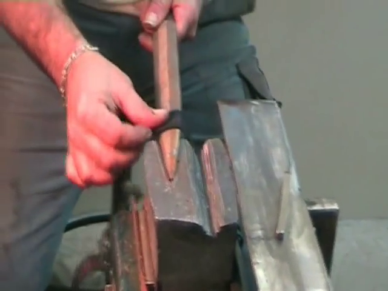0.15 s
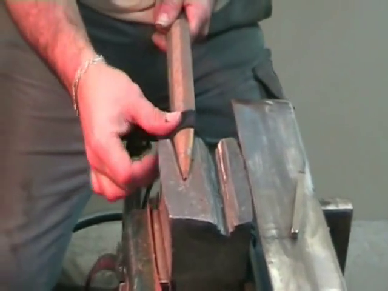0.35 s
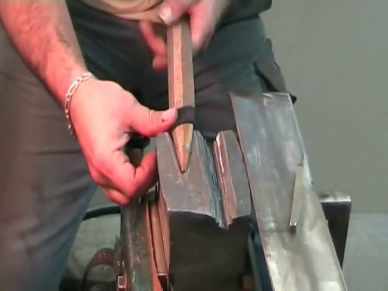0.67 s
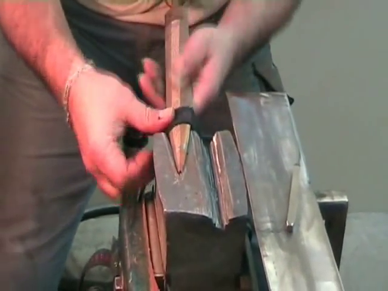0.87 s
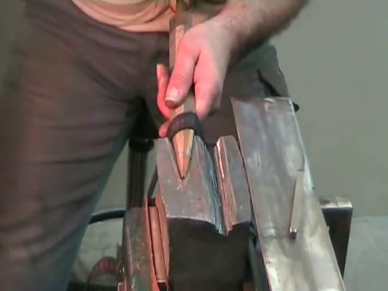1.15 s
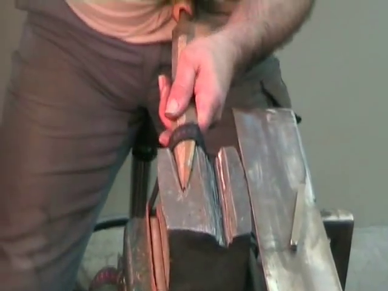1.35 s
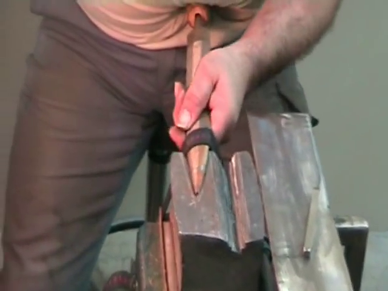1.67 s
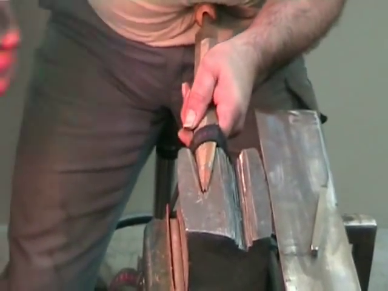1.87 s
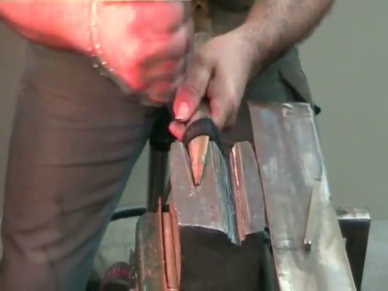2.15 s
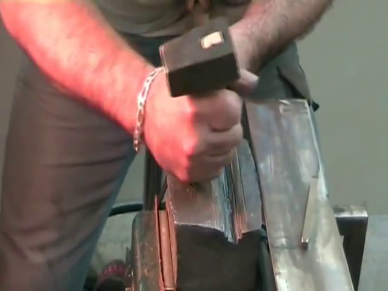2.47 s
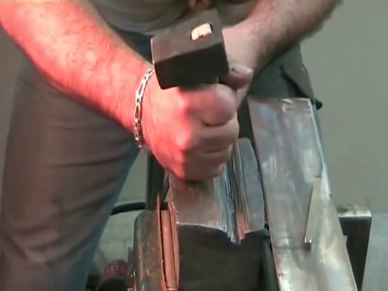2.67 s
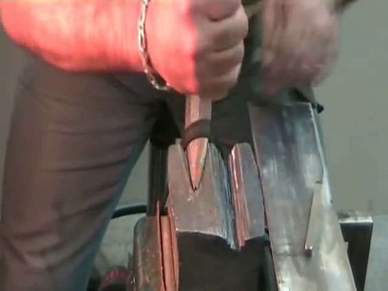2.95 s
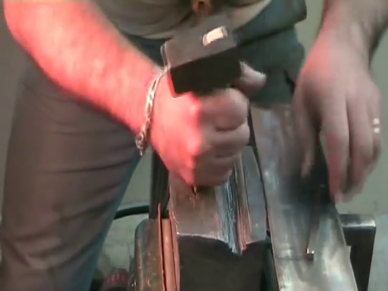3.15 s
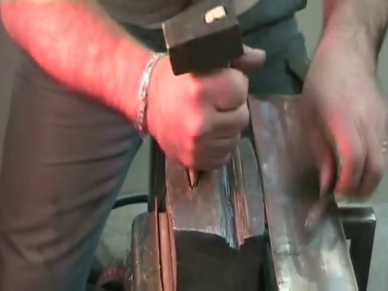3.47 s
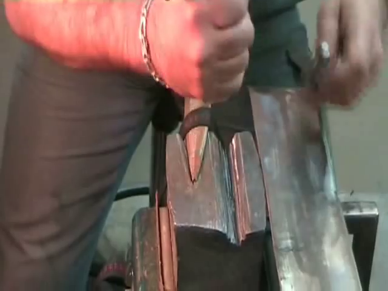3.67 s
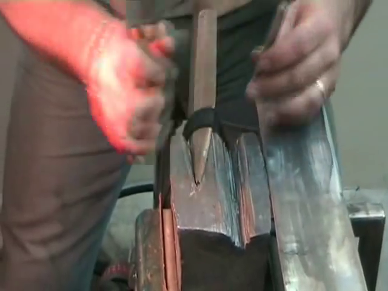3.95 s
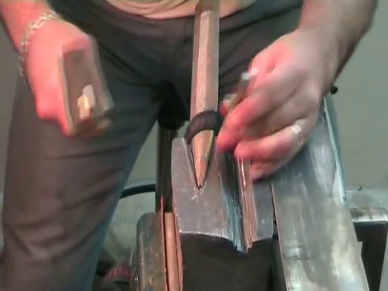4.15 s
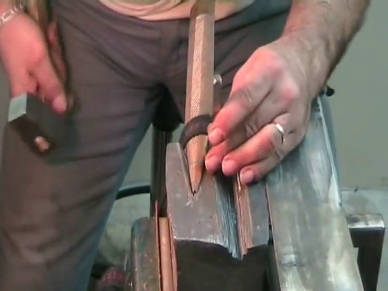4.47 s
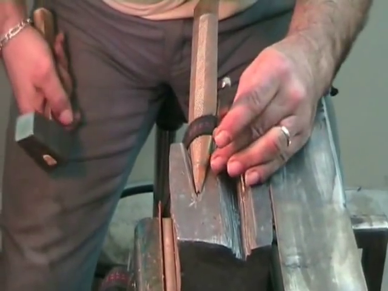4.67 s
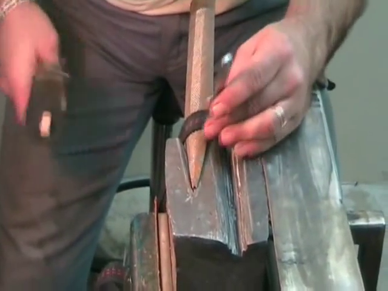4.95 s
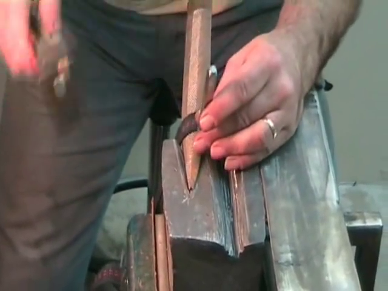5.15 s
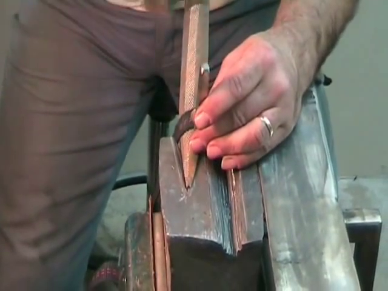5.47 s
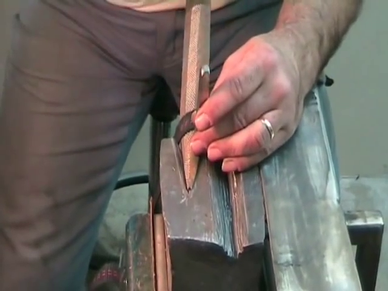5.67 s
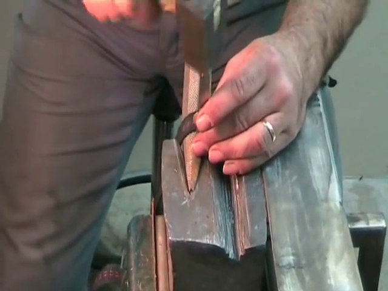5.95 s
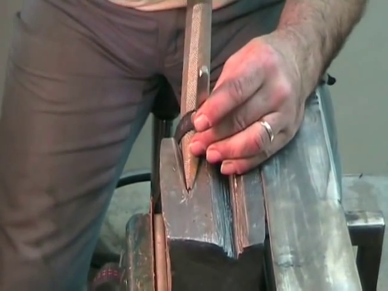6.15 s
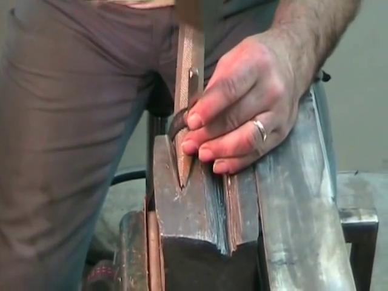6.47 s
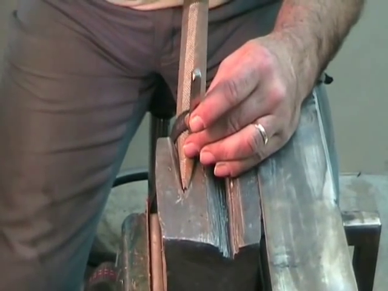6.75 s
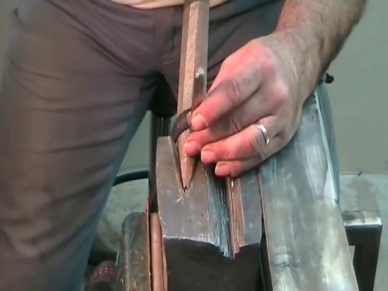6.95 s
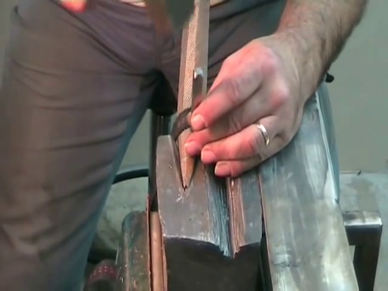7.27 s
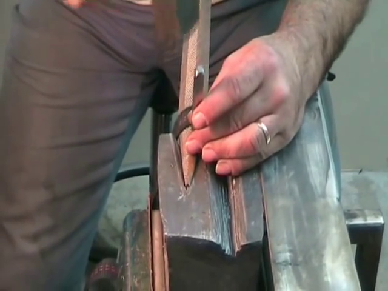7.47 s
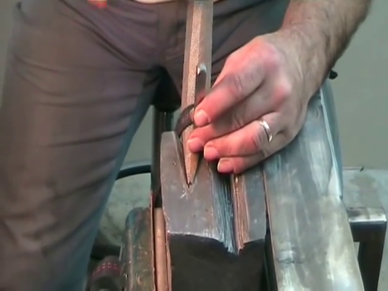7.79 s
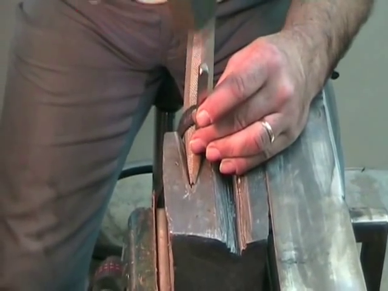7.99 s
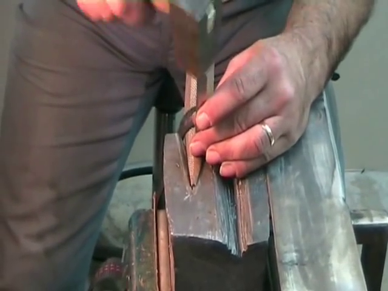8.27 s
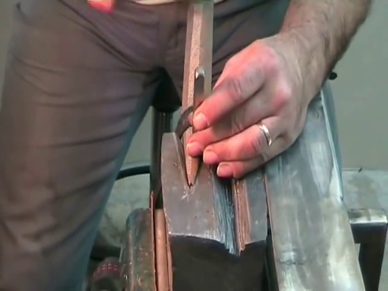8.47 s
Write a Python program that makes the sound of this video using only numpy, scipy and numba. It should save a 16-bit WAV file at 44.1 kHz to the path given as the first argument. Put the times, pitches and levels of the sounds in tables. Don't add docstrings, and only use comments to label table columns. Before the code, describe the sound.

In a bare, echoing workshop with faint engine drone and machine whine, small tools tick and clink and a bench gets a dull knock. A hammer drives steel into an anvil block with four heavy, ringing blows, a little punch pinging between them. After a pause come two sharper, higher cracks, a rest, then two more. The nearby camcorder microphone overloads and dips, then lets the echo swell.

```python
import sys
import numpy as np
from scipy import signal
from scipy.fft import rfft, irfft, next_fast_len
from scipy.io import wavfile
from scipy.ndimage import uniform_filter1d
from numba import njit

SR = 44100
rng = np.random.default_rng(int(sys.argv[2]) if len(sys.argv) > 2 else 0)


def ratio_of_db(decibels):
    return 10 ** (np.asarray(decibels, float) / 20)


def transcribe(signal):
    frames = np.atleast_2d(signal).T
    limited = np.clip(frames, -1, 1)
    pcm = np.round(limited * 32767).astype(np.int16)
    wavfile.write(sys.argv[1], SR, pcm)


N = 380141


def unit(x):
    return x / np.sqrt(np.mean(x ** 2))


def along(table, hz):
    table = np.array(table)
    return np.interp(np.log(np.maximum(hz, 1)), np.log(table[:, 0]), table[:, 1])


def colour(x, table):
    size = x.shape[-1]
    gain = ratio_of_db(along(table, np.fft.rfftfreq(size, 1 / SR)))
    return unit(irfft(rfft(x) * gain, size))


# (frequency [Hz], correlation [-1..1])
ALIKE = [(40, -.8), (65, -.6), (95, .65), (300, .9), (1000, .88), (2500, .85), (6000, .86), (14000, .75)]


def pair(size, likeness=ALIKE):
    alike = np.clip(along(likeness, np.fft.rfftfreq(size, 1 / SR)), -.99, .99)
    shares = np.sqrt([(1 + alike) / 2, (1 - alike) / 2])
    mid, side = rfft(rng.standard_normal((2, size))) * shares
    return irfft(np.array([mid + side, mid - side]), size)


def fade(seconds, t60):
    return np.exp(-np.log(1000) * np.arange(int(seconds * SR)) / SR / t60)


def ring(modes, shorten, scatter_db):
    t = np.arange(SR) / SR
    out = np.zeros(SR)
    for hz, db, t60 in modes:
        level_chance, pitch_chance = rng.standard_normal(2)
        tone = np.sin(2 * np.pi * hz * (1 + .0015 * pitch_chance) * t)
        bloom = 1 - np.exp(-t * hz / 2.5)
        out += ratio_of_db(db + scatter_db * level_chance) * tone * fade(1, t60 * shorten) * bloom
    return out


def steep(x, hz, width):
    b, a = signal.iirpeak(hz, hz / width, SR)
    return signal.lfilter(b, a, signal.lfilter(b, a, x))


def pulse(table, tilt_db):
    hz = np.fft.rfftfreq(4096, 1 / SR)
    tilt = tilt_db * np.log2(np.maximum(hz, 50) / 1000)
    cepstrum = irfft(np.log(ratio_of_db(along(table, hz) + tilt)))
    cepstrum = cepstrum * np.r_[1, np.full(2047, 2), 1, np.zeros(2047)]
    return unit(irfft(np.exp(rfft(cepstrum)))) / 64


def add(track, s, x):
    i = int(s * SR)
    track[..., i:i + x.shape[-1]] += x[..., :N - i]


# (frequency [Hz], level [dB])
AIR = [(12, -52), (20, -14.5), (198, -2), (228, -6.5), (270, -8.5), (377, -8), (422, -13), (802, -14.5),
       (1370, -20), (1610, -23), (2820, -28), (6180, -29.5), (7520, -36), (11400, -32.5), (16000, -39.5)]
# (frequency [Hz], correlation [-1..1])
AIR_ALIKE = [(40, -0.67), (100, -1.24), (160, -0.37), (290, -0.073), (640, 0.24), (1400, 0.39),
             (6000, 0.35), (14000, 0.98)]


def air():
    rumble = colour(pair(N), [(15, -58), (28, -18), (45, -10), (65, -6), (90, -48), (400, -90)])
    head_drum = colour(pair(N), [(10500, -54), (11000, -13), (11300, 0), (11600, -28), (12500, -80)])
    return ratio_of_db(-43.5) * colour(pair(N, AIR_ALIKE), AIR) + ratio_of_db(-64.5) * head_drum + ratio_of_db(-47.5) * rumble


# (frequency [Hz], level [dB])
MACHINE_TONES = [(263.8, -54.5), (371.4, -58), (495.3, -62.5), (780.6, -70), (3138, -69), (4500, -72), (4953, -78),
                 (5399, -72), (5701, -72), (6099, -70),
                 (81, -62), (133, -56)]


def whines():
    t = np.arange(N) / SR
    out = np.zeros(N)
    for hz, db in MACHINE_TONES:
        steps = np.repeat(rng.standard_normal(N // 2000 + 1), 2000)
        waver = uniform_filter1d(steps, 4000)[:N]
        out += ratio_of_db(db + 3.0 + 1.0 * waver) * np.sin(2 * np.pi * hz * t + 3.16 * waver)
    return out


# (time [s], length [s], first pitch [Hz], last pitch [Hz], level [dB])
ENGINES = [
    (0.348, 1.02, 39.9, 41.7, -55.5),
    (1.5, 1.6, 43, 50.7, -70),
    (3.395, .95, 31, 49, -54),
    (4.296, 0.67, 42.2, 40.7, -59.5),
    (5.305, 2.33, 49.2, 49.8, -61),
    (7.802, 0.99, 35.1, 41.2, -56),
]


def engines():
    swell_s, octave_db = .12, -15
    out = np.zeros(N)
    for s, length, first_hz, last_hz, db in ENGINES:
        t = np.arange(int(length * SR)) / SR
        pitch = first_hz + (last_hz - first_hz) * np.sin(np.pi / 2 * t / length)
        turn = 2 * np.pi * np.cumsum(pitch) / SR
        swell = np.clip(np.minimum(t, length - t) / swell_s, 0, 1)
        add(out, s, ratio_of_db(db + 3) * swell * (np.sin(turn) + ratio_of_db(octave_db) * np.sin(2 * turn)))
    side = 2.4 * signal.hilbert(out, next_fast_len(N))[:N].imag
    return np.array([out + side, out - side])


# (frequency [Hz], t60 [s])
ROOM_T60 = [(90, 1.2), (260, 0.72), (700, 0.82), (1840, 0.82), (4850, 0.68), (12800, 0.37)]
# (time after the blow [s], level over the tail [dB])
ROOM_ECHOES = [
    (0.058, 1.5),
    (0.114, 0.5),
    (.175, -0.5),
]


def room(x):
    size = int(1.6 * SR)
    t, hz = np.arange(size) / SR, np.fft.rfftfreq(size, 1 / SR)
    noise, tail = rfft(pair(size)), 0
    for centre in 45 * 2. ** np.arange(0, 9, .5):
        share = np.maximum(0, 1 - 2 * np.abs(np.log2(np.maximum(hz, 1) / centre)))
        build = 1 - np.exp(-t / (0.0027 + 0.44 / centre))
        decay = np.exp(-np.log(1000) * t / along(ROOM_T60, centre))
        tail = tail + irfft(noise * share, size) * build * decay
    for s, db in ROOM_ECHOES:
        tail = tail * ratio_of_db(db * np.exp(-((t - s) / 0.004) ** 2))
    tail = tail / np.sqrt(np.sum(tail ** 2) / 2)
    return signal.fftconvolve(tail, x[None])[:, :N]


# (time [s], level [dB], centre [Hz], length [s])
SCUFFS = [
    (0., -35, 200, 0.052),
    (.01, -42.5, 8800, 0.021),
    (0.906, -38.5, 1420, 0.035),
    (1.066, -35, 770, 0.058),
    (4.312, -39.5, 5670, 0.0073),
    (4.318, -43.5, 213, 0.69),
    (4.331, -45.5, 590, 0.15),
]
# (time [s], level [dB], pitch [Hz], length [s])
KNOCKS = [
    (0., -38, 498, 0.041),
    (1.089, -41.5, 284, 0.19),
    (1.64, -62, 4450, .17),
    (4.317, -35, 770, 0.069),
    (7.3, -45.5, 810, 0.052),
]


def scuffs_and_knocks():
    bursts = [(s, db, hz, 1.17 * hz, length) for s, db, hz, length in SCUFFS]
    bursts += [(s, db, hz, 104, length) for s, db, hz, length in KNOCKS]
    out = np.zeros(N)
    for s, db, hz, width_hz, length in bursts:
        noise = unit(steep(rng.standard_normal(SR // 2), hz, width_hz))
        add(out, s, ratio_of_db(db) * noise * fade(.5, 3 * length))
    return out


# (time [s], peak level [dB], centre [Hz])
TICKS = [
    (.110, -23.5, 1790),
    (.284, -21, 4440),
    (0.427, -11.5, 1940),
    (0.4268, -7.5, 5200),
    (1.071, -31, 3700),
    (3.440, -7.5, 6000),
    (4.317, -26, 5460),
    (5.885, -51, 3640),
]


def ticks():
    out = np.zeros(N)
    for s, db, hz in TICKS:
        click = steep(signal.unit_impulse(SR // 20), hz, 0.74 * hz)
        add(out, s, ratio_of_db(db) * click / np.abs(click).max())
    return out


# (time [s], peak level [dB])
PART_CLINK = [
    (0.2855, -33),
]
LOOSE_CLINK = [
    (0.4278, -12),
]
BENCH_KNOCK = [
    (1.471, -4.5),
]
PUNCH_CLINK = [
    (3.4409, -10.5),
]
# (frequency [Hz], level [dB], t60 [s])
SMALL_PART = [(3200, -9, 0.18), (4390, -0.5, 0.067), (5300, -10, 0.1)]
LOOSE_TOOL = [(1238, -8, .75), (1672, -12, .3), (1787, -9, .4), (1930, -12, .3), (2067, -12, .4),
              (2202, -5, .5), (2315, -5, .4), (2638, -23, .4), (4005, -14, .45), (4075, -6, .55),
              (4506, -16, .25), (4877, -13, .5), (5830, -9, .4), (6950, -19, .2), (7600, -20, .1),
              (8489, -23, .3), (11300, -30, .3)]
BENCH = [(200, 6.5, 0.041), (294, 6, 0.039), (386, -31, .06)]
SMALL_PUNCH = [(2767, -23, .5), (3433, -3, .5), (4344, -24, .3), (5190, -5, .05), (5480, -7, .25),
               (5970, -8, .3), (6142, -3, .2), (6298, -6, .25), (7068, -16, .3), (13390, -14, .15),
               (8538, -16, .09), (9275, -11, .12), (10650, -19, .12)]


def clinks():
    out = np.zeros(N)
    for table, modes, trim_db, shorten in ((PART_CLINK, SMALL_PART, 0, 1), (LOOSE_CLINK, LOOSE_TOOL, -10, .4),
                                           (BENCH_KNOCK, BENCH, -3, .9), (PUNCH_CLINK, SMALL_PUNCH, -6, .8)):
        s, db = table[0]
        add(out, s, ratio_of_db(db + trim_db) * ring(modes, shorten, scatter_db=1.0))
    return out


# (time [s], peak level [dB])
PUNCH_HOP = (3.191, -6.5)
# (frequency [Hz], level [dB], t60 [s])
HOP_RING = [(6140, 0, .16), (6290, -2, .13)]


def punch_hop():
    out = np.zeros(N)
    s, db = PUNCH_HOP
    add(out, s, ratio_of_db(db) * ring(HOP_RING, shorten=0.73, scatter_db=0.5))
    return out


def blows(table, crack, body, modes, extra, crack_t60, body_db, anvil_db):
    near, far = np.zeros((2, N)), np.zeros(N)
    for s, db, tilt_db, head_db in table:
        steel = ratio_of_db(db + anvil_db) * ring(modes, shorten=.7, scatter_db=2.0)
        head = ratio_of_db(db + head_db) * ring(extra, shorten=.9, scatter_db=1.5)
        snap = colour(pair(8192), crack)[:, :4410] * fade(.1, crack_t60)
        add(near, s, ratio_of_db(db + 3) * snap)
        add(near, s, steel + head)
        add(far, s, ratio_of_db(db + body_db) * pulse(body, tilt_db))
        add(far, s, ratio_of_db(-5) * steel + ratio_of_db(-8.5) * head)
    return near, far


# (time [s], level [dB], brightness [dB per octave], hammer head ring [dB])
MANDREL_BLOWS = [
    (2.4755, 0.5, 2, -15),
    (3.167, 3, 2.5, -17),
    (3.531, 0, 0.5, -37),
    (3.872, -0.5, 1, -28),
]
# (frequency [Hz], level [dB per Hz])
MANDREL_CRACK = [(150, -36), (300, -13), (1280, 3), (2300, -9.5), (4800, -5), (7800, -16.5), (11000, -14.5),
                 (15500, -40), (19000, -8)]
MANDREL_BODY = [(50, -11), (100, -9.5), (130, 1.5), (250, -0.5), (390, -1.5), (520, -6.5), (620, -8),
                (800, -6.5), (1800, -14), (2400, -19), (6200, -23.5), (10000, -27.5), (14000, -33.5),
                (17000, -21)]
# (frequency [Hz], level [dB], t60 [s])
MANDREL_RING = [(128, -4, .6), (166, -3, .5), (204, 0, .6), (303, -2, .5), (318, 1, .6), (505, -8, .6),
                (528, -6, .6), (696, -17, .3), (785, -8, .5), (1040, -14, .4), (1302, -12, .4),
                (1544, -12, .4)]
HAMMER_HEAD = [(2767, -17, .7), (3437, -9, .22), (4344, -9, .35), (5500, -5, .2), (6000, -6, .2),
               (6150, -2, .17), (6385, -2, .17), (7391, -9, .25), (8543, -9, .25), (8807, -9, .25),
               (9275, -9, .12), (10700, -11, .15), (12550, -12, .1), (13390, -5, .25)]


def mandrel_blows():
    return blows(MANDREL_BLOWS, MANDREL_CRACK, MANDREL_BODY, MANDREL_RING, HAMMER_HEAD,
                 crack_t60=0.019, body_db=23, anvil_db=-12.5)


# (time [s], level [dB], brightness [dB per octave], plate ring [dB])
PUNCH_BLOWS = [
    (5.988, 7.4, 0.05, -37),
    (6.461, 8.65, 0.074, -23),
    (7.964, 8.8, 0.2, -23),
    (8.333, 9.1, 0.22, -28.5),
]
# (frequency [Hz], level [dB per Hz])
PUNCH_CRACK = [(150, -42), (400, -24), (1400, -13), (2100, -19), (3700, -2.5), (5100, -9), (6300, 3.5),
               (9700, -17), (12000, -4), (14500, -2), (19000, -61)]
PUNCH_BODY = [(50, -28), (110, -12), (200, -8), (313, 0), (390, -12.5), (510, -10), (600, -13.5),
              (970, -16.5), (2000, -19.5), (3000, -23), (6600, -16.5), (9000, -22.5), (13500, -23.5),
              (17000, -46)]
# (frequency [Hz], level [dB], t60 [s])
PUNCH_RING = [(204, -4, .6), (252, -10, .5), (305, -4, .6), (322, 1, .7), (452, -6, .6), (508, -2, .7),
              (528, -3, .6), (786, -8, .5), (1544, -14, .5), (1857, -10, .6), (2062, -14, .4),
              (2185, -12, .5)]
ANVIL_PLATE = [(980, 4, .42), (1066, -12, .5), (2767, -19, .8)]


def punch_blows():
    return blows(PUNCH_BLOWS, PUNCH_CRACK, PUNCH_BODY, PUNCH_RING, ANVIL_PLATE,
                 crack_t60=0.026, body_db=18.0, anvil_db=-19)


def scene():
    background = air() + whines() + engines()
    small, light = ticks() + scuffs_and_knocks(), clinks()
    mandrel_near, mandrel_far = mandrel_blows()
    punch_near, punch_far = punch_blows()
    near = mandrel_near + punch_near + punch_hop() + small + light
    to_walls = mandrel_far + punch_far + ratio_of_db(2.0) * small + ratio_of_db(-3.5) * light
    work = near + room(to_walls)
    return signal.sosfilt(signal.butter(4, 95, "high", fs=SR, output="sos"), work) + background


@njit
def follow(x, attack, release):
    out, e = np.empty(len(x)), 0.
    for i in range(len(x)):
        e += (x[i] - e) * (attack if x[i] > e else release)
        out[i] = e
    return out


def band_limit(x):
    return signal.sosfilt(signal.butter(12, 16380, fs=SR, output="sos"), x)


# (frequency [Hz], level [dB])
RIGHT_PORT = [(40, 3.5), (70, -5), (200, -1.5), (600, -1.5), (2500, -0.36), (5000, -0.1), (9000, 0.26)]


def record(dry):
    lag_samples = 1.197
    delay = np.exp(-2j * np.pi * np.fft.rfftfreq(N) * lag_samples)
    port = delay * ratio_of_db(along(RIGHT_PORT, np.fft.rfftfreq(N, 1 / SR)))
    x = np.array([dry[0], irfft(rfft(dry[1]) * port, N)])
    sensed = signal.lfilter(*signal.butter(1, 300, "high", fs=SR), x)
    level = follow(np.abs(sensed).max(0), 1 / (0.0016 * SR), 1 / (0.06 * SR))
    level = np.interp(np.arange(N) - 0.0022 * SR, np.arange(N), level)
    gain = np.minimum(1, ratio_of_db(-9.0) / (level + 1e-9)) ** 0.7
    overloaded = np.clip(x * gain, -1.05, 1.05)
    heard = signal.sosfilt(signal.butter(6, 15000, fs=SR, output="sos"), overloaded)
    mix = np.clip(heard, -1, 1)
    return band_limit(mix)


dry = scene()
out = record(dry)
transcribe(out)
```